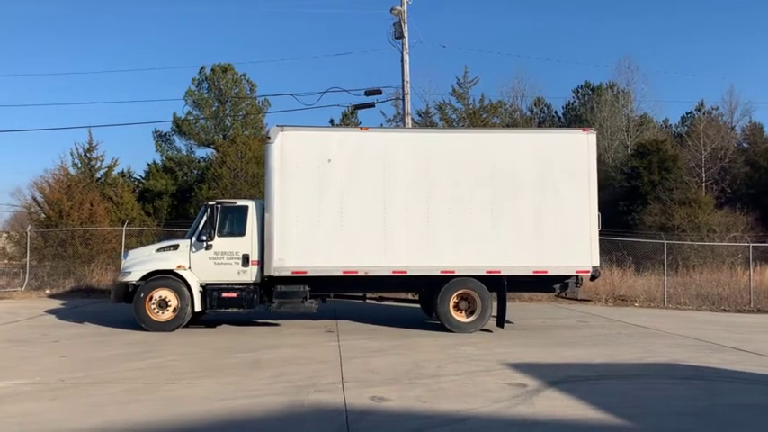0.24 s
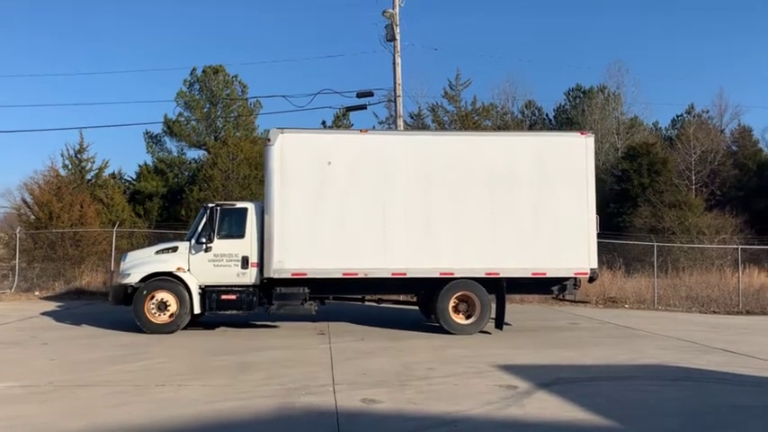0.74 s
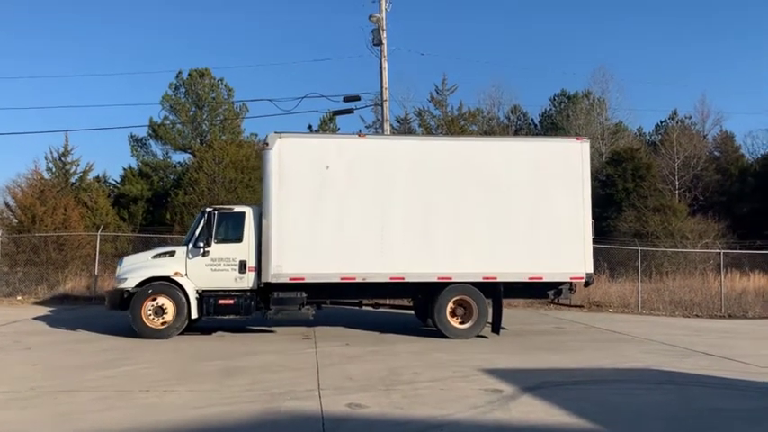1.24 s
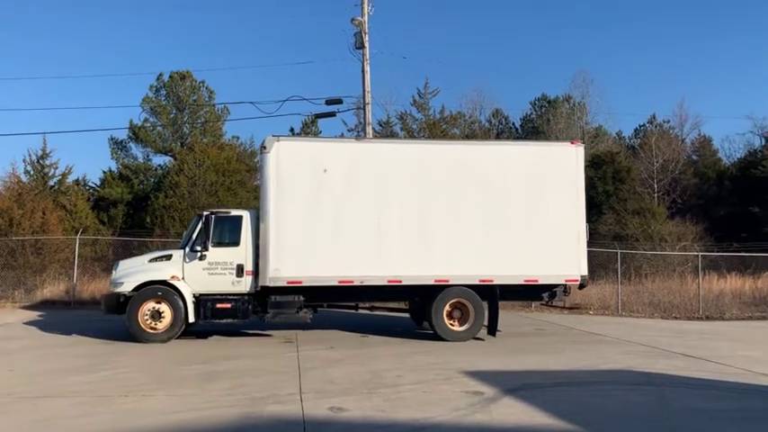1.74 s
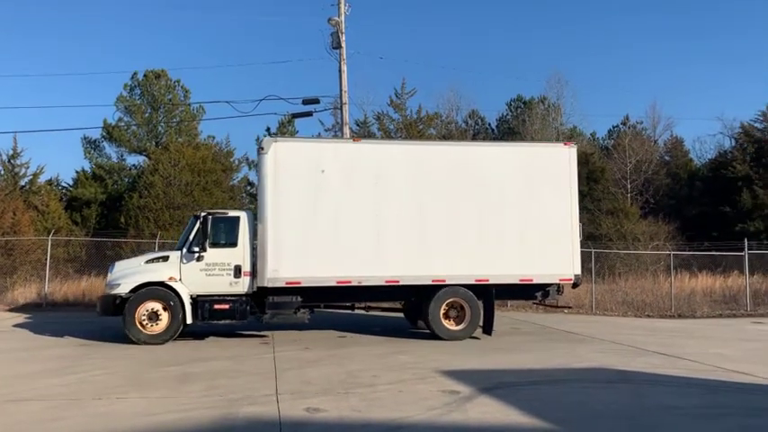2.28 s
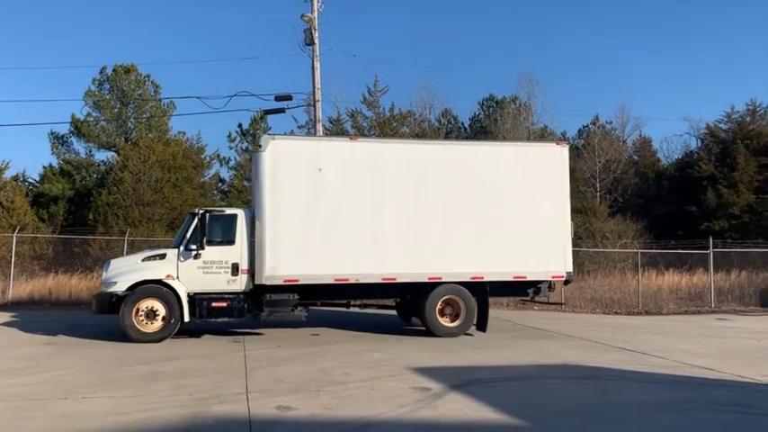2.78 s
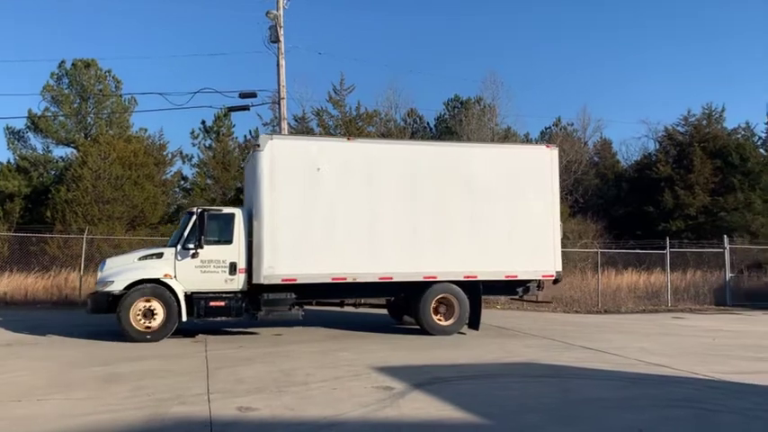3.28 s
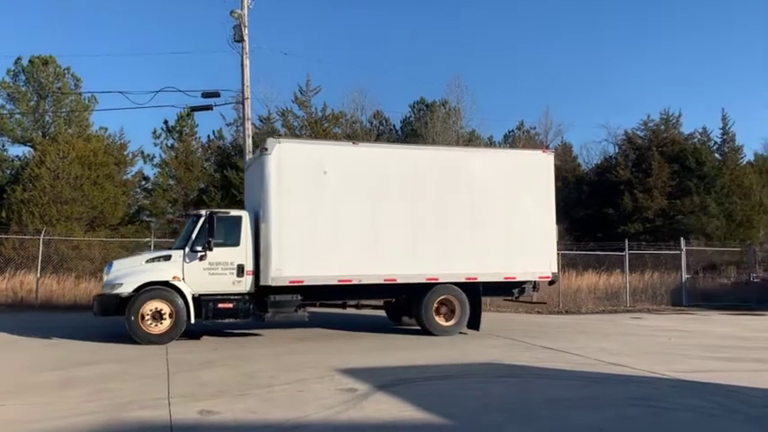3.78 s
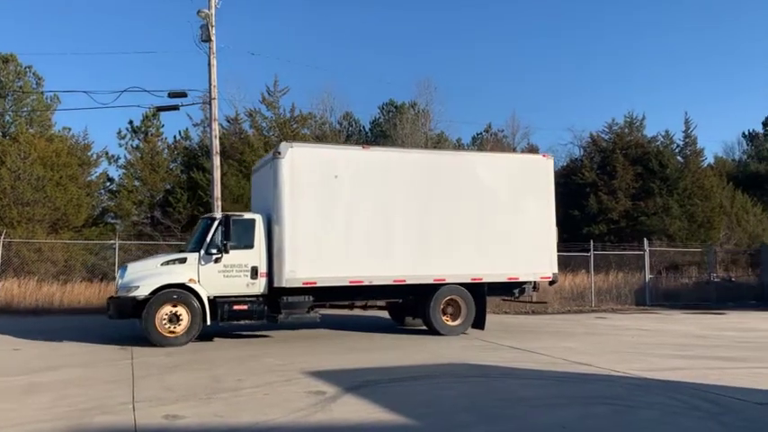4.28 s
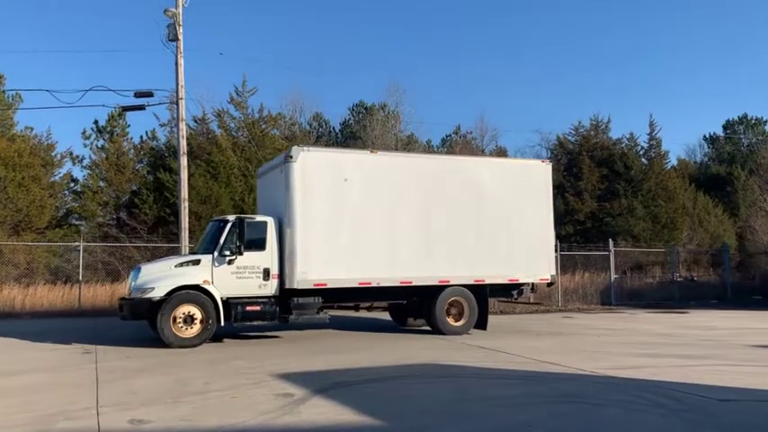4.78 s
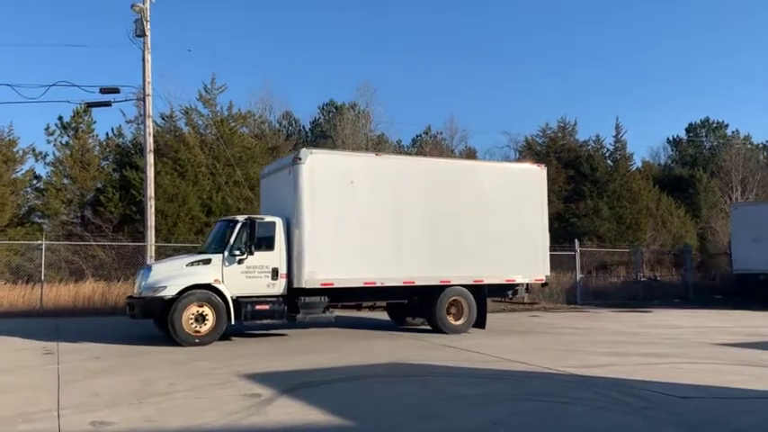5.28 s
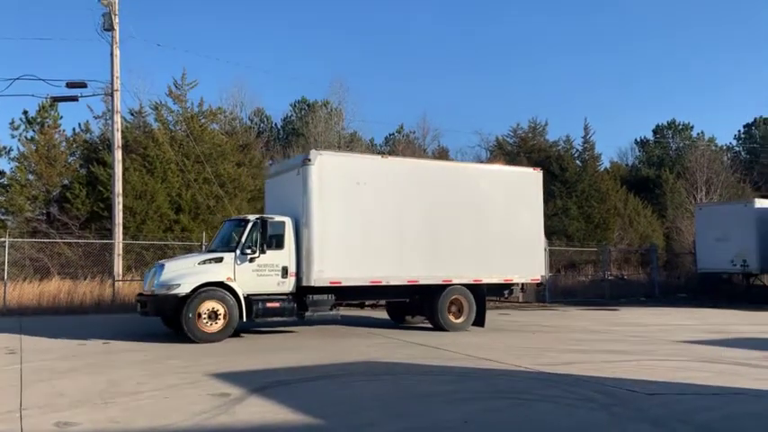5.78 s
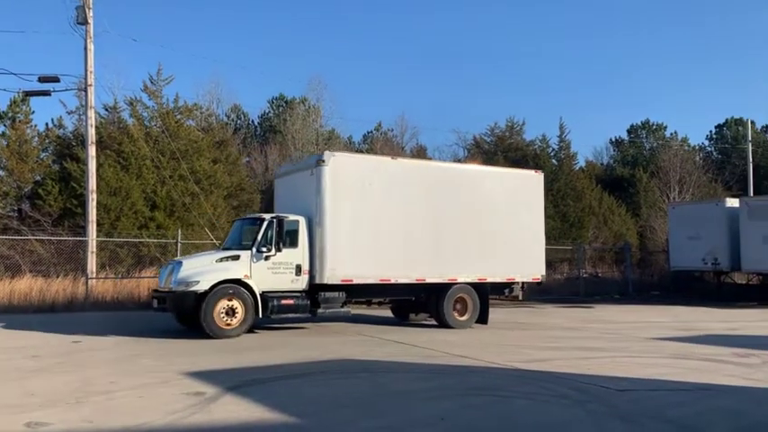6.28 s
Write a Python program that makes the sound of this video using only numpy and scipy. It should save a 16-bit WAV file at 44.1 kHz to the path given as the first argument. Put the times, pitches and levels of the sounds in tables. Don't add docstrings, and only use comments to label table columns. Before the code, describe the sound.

Outdoors on a concrete lot, a stereo microphone a few metres away hears a six-cylinder diesel truck already running. A deep, uneven exhaust drone, pulsing about 43 times a second, lifts to about 47 by 0.3 s, under a fan hum, rough midrange block roar and fast, dry injector clatter. Small irregular knocks and ticks stand out. Very faint high belt chirps come near 0.2, 1.8 and 3.3 s. Revs step up around 2.2 s and again near 4 s, the fullest point, while the turning cab dulls the roar. From about 4.8 s fuel is cut and the pitch slides down quickly, reaching a steady idle near 35 pulses a second by 5.3 s, quieter, softer and throbbing. At 6.3 s a brief bright metal rattle and crack is followed by dull thuds; the idle continues to 6.5 s. Faint airy hiss throughout.

```python
import sys
import numpy as np
from scipy import signal
from scipy.fft import rfft, irfft, next_fast_len
from scipy.io import wavfile
from scipy.ndimage import uniform_filter1d

SR = 44100
rng = np.random.default_rng(int(sys.argv[2]) if len(sys.argv) > 2 else 0)


def wav_out(sig):
    wavfile.write(sys.argv[1], SR, np.round(np.clip(np.atleast_2d(sig).T, -1, 1) * 32767).astype(np.int16))


def volts(x):
    e = np.asarray(x, float) / 20
    return 10 ** e


N = 288414

# time in seconds, firing rate in Hz.
ENGINE = [(0.0, 43.2), (0.1, 43.16), (0.32, 46.91), (1.0, 47.04), (1.82, 46.58), (2.2, 49.87),
          (2.55, 49.59), (3.55, 48.99), (4.0, 52.24), (4.8, 52.17), (4.95, 46.98), (5.1, 38.3), (5.3, 35.7),
          (6.54, 35.48)]
# time in seconds, turn from 0 to 1.
HEADING = [
    (0, 0.09),
    (3.0, 0),
    (3.8, 0.27),
    (4.7, 0.91),
    (6.54, 0.99),
]
# dB at full load side-on, dB per dB of load, dB at full turn, dB per Hz of revs.
RUMBLE_LAW = (-24.5, 0.1, 0.5, 0.48)
CLATTER_BY_CYLINDER = [2, 4, 0, 2, 3.5, 3.5]


def rms_one(x):
    return x / np.sqrt(np.mean(x ** 2) + 1e-20)


def in_time(rows):
    s, *columns = np.transpose(rows)
    return [np.interp(np.arange(N) / SR, s, c) for c in columns]


def at_hz(points, hz, column=1):
    points = np.array(points)
    return np.interp(np.log(hz + 1), np.log(points[:, 0]), points[:, column])


def colour(x, spectrum):
    size = next_fast_len(N)
    hz = np.arange(size // 2 + 1) * SR / size
    return rms_one(irfft(rfft(x, size) * volts(at_hz(spectrum, hz)), size)[:N])


def drift(rate):
    r = np.exp(-80 * np.pi * rate / SR)
    slow = signal.lfilter([1], [1, -2 * r, r * r], rng.standard_normal(N // 40 + 2002))[2000:]
    return np.interp(np.arange(N) / 40, np.arange(len(slow)), rms_one(slow))


def band(x, order, hz, kind):
    return signal.sosfilt(signal.butter(order, hz, kind, fs=SR, output="sos"), x)


def peak(hz, width_hz):
    r = np.exp(-np.pi * width_hz / SR)
    return (1 - r * r) / 2 * np.array([1, 0, -1]), [1, -2 * r * np.cos(2 * np.pi * hz / SR), r * r]


def resonate(x, peaks):
    out = 0
    for k, (hz, width_hz, db) in enumerate(peaks):
        out = out + (-1) ** k * volts(db) * signal.lfilter(*peak(hz, width_hz), x)
    return rms_one(out)


def strike(times, levels_db, modes, alternate=False):
    out, at = np.zeros(N), (np.asarray(times) * SR).astype(int)
    for k, (hz, level_db, t60) in enumerate(modes):
        clicks = np.full(N, 1e-18)
        clicks[at] = volts(levels_db + level_db + rng.normal(0, 0.93, len(at)))
        r, w = volts(-60 / (t60 * SR)), 2 * np.pi * hz / SR
        ring = signal.lfilter([0, np.sin(w)], [1, -2 * r * np.cos(w), r * r], clicks)
        out += (-1) ** (k * alternate) * ring
    return out


def follow(law):
    # time in seconds, load in dB.
    fuelling = [(0.0, -3), (0.25, -3), (0.9, -2), (1.7, 0), (2.25, 0.5), (3.0, -0.5), (4.68, 0), (4.79, 0),
                (4.86, -5.5), (5.0, -5), (5.23, -5.5), (5.29, -3), (5.5, -1), (6.05, -1), (6.35, 2.5),
                (6.54, 0.5)]
    working_hz = 50
    revs = in_time(ENGINE)[0] - working_hz
    return law[0] + law[1] * in_time(fuelling)[0] + law[2] * in_time(HEADING)[0] + law[3] * revs


def overrun(firing_hz):
    slope = np.gradient(in_time(ENGINE)[0]) * SR
    return uniform_filter1d(np.minimum(slope + 8, 0), size=2000)


def bursts(firings, by_cylinder, spread_db, sharp):
    which = firings.astype(int)
    level_db = np.array(by_cylinder)[which % 6] + spread_db * rng.standard_normal(400)[which]
    return rms_one(uniform_filter1d(volts(level_db) * np.exp(-sharp * (firings - which)), size=130))


def repeating(firings):
    every, own = rng.standard_normal((2, 900)), rng.standard_normal((2, 5400))
    place = (firings * 900).astype(int)
    return rms_one(every[:, place % 900] + .7 * own[:, place % 5400])


def tones(firing_hz, firings):
    # multiple of firing rate, dB at full load side-on, dB per dB of load, dB at full turn, dB per Hz of revs.
    main_tones = [(1, -31.5, 0, -12.5, 0.82), (3, -38, 1.5, -8, -0.04), (3.2, -39, 2.5, -7.5, 3.5),
                  (6.4, -36, 1, 1.5, 0.5), (2, -36.5, 1.5, -0.5, 0.5), (8, -47, 1.5, -9.5, -0.45)]
    # depth in dB, rate per second.
    wavers = [(.9, 5), (5, 14), (4.5, 1.7), (1, 12), (3, 9.3), (3.5, 2.7)]
    # centre in Hz, width in Hz, lift in dB.
    lifts = [(49.7, 16, 9), (144, 10.3, 8.5), (340, 14.6, 5), (366.8, 15, 8.5)]
    # multiple of firing rate, level in dB over the rumble.
    weak_tones = [(1.3, -23), (3.1, -20.5), (8 / 3, -17.5), (10, -29), (38 / 3, -28.5), (15, -23.5)]
    turn, out = 2 * np.pi * firings, 0
    for k, ((multiple, *law), (waver_db, rate)) in enumerate(zip(main_tones, wavers)):
        lift_db = sum(db / (1 + ((multiple * firing_hz - hz) / width_hz) ** 2) for hz, width_hz, db in lifts)
        sag = .02 if k == 0 else .12
        sag_db = sag * multiple ** 0.32 * overrun(firing_hz)
        level_db = follow(law) + lift_db + waver_db * drift(rate) + sag_db
        out = out + volts(level_db) * np.sin(multiple * turn + k)
    rumble_db = follow(RUMBLE_LAW) + 0.11 * overrun(firing_hz)
    for k, (multiple, level_db) in enumerate(weak_tones):
        out += volts(rumble_db + level_db + 4.2 * drift(1.9)) * np.sin(multiple * turn + k)
    return np.sqrt(2) * out


def exhaust(firings):
    manifold = [-1, 4.5, 2.5, -2.5, 6, -10]
    # centre in Hz, width in Hz, level in dB.
    pipe = [(94, 31, -11), (144.7, 19, 1.5), (181, 17, -11), (213.4, 3.5, 6), (281, 16, -5),
            (328.2, 7.7, 9.5), (370, 11, 0.5)]
    # frequency in Hz, density in dB per Hz.
    rumble = [(30, -36), (50, -3.5), (75, 4.5), (120, 3.5), (160, 5.5), (250, 3.5), (350, -1.5),
              (480, -5.5), (700, -45)]
    # dB at full load side-on, dB per dB of load, dB at full turn, dB per Hz of revs.
    ringing_law = (-5.5, 0.1, 0.5, 0)
    pulses = bursts(firings, manifold, spread_db=5.5, sharp=32.0)
    gas = colour(rng.standard_normal(N), rumble) * volts(.9 * drift(7))
    pulses = rms_one(band(pulses, 4, 70, "high"))
    ringing = resonate(pulses + 0.61 * gas, pipe)
    return volts(follow(RUMBLE_LAW)) * (volts(follow(ringing_law)) * ringing + volts(-2.5) * gas)


def box():
    # dB at full load side-on, dB per dB of load, dB at full turn, dB per Hz of revs.
    box_law = (-43, 1.1, 1.5, -0.1)
    box_hz, width_hz = 329.2, 7
    return volts(follow(box_law)) * resonate(rng.standard_normal(N), [(box_hz, width_hz, 0)])


def still_air(firing_hz):
    # frequency in Hz, density in dB per Hz.
    air_spectrum = [(5000, -24), (8000, -15), (9600, 0), (11000, 6), (12500, 6), (14200, 1), (15500, -6)]
    level_db = -69 + 0.09 * overrun(firing_hz) + 1.5 * in_time(HEADING)[0]
    return volts(level_db) * colour(rng.standard_normal(N), air_spectrum)


def block(firings):
    # time in seconds, peak in dB.
    heavy_knocks = [(0.243, -17), (0.31, -27), (0.392, -21), (0.455, -30), (0.566, -25), (0.642, -18),
                    (0.695, -19), (0.924, -21), (0.959, -19), (1.213, -16), (1.34, -26), (1.468, -19),
                    (1.541, -16), (1.725, -25), (2.045, -18), (2.103, -20), (2.448, -13), (2.587, -18),
                    (2.644, -27), (2.708, -21), (3.003, -14), (3.072, -19), (3.202, -30), (3.546, -24),
                    (3.589, -23), (3.655, -24), (4.38, -23), (4.417, -21), (4.44, -23), (4.494, -30),
                    (4.627, -31), (4.647, -26), (4.935, -33), (4.997, -35), (5.122, -38), (5.258, -33),
                    (5.288, -28), (5.31, -18), (5.399, -29), (5.485, -18.5), (5.628, -31), (5.649, -21),
                    (5.823, -25), (6.021, -27), (6.133, -24)]
    # centre in Hz, width in Hz, level in dB.
    panels = [(627, 19, 9), (772, 17.2, 16.5), (839, 32, 3), (894, 5, 0), (1079, 47, 18.5),
              (1260, 57, 18.5), (1501, 56, 16), (1702, 56, 11), (1800, 25, -1), (1167, 266, 12)]
    # frequency in Hz, density in dB per Hz.
    roar_spectrum = [(300, -61), (500, -3.5), (800, 2.5), (1300, -1.5), (1700, -5), (2100, -20.5),
                     (2800, -45)]
    # frequency in Hz, density in dB per Hz.
    bright_spectrum = [(1200, -3.5), (1700, 6), (2000, 1.5), (2400, 2), (2800, -5), (3300, -15),
                       (4500, -32.5)]
    # dB at full load side-on, dB per dB of load, dB at full turn, dB per Hz of revs.
    roar_law = (-28.5, 0.7, -5, 0.24)
    bright_law = (-7, 0.66, -5, -0.01)
    roar_db = follow(roar_law)
    knock = bursts(firings + .1, CLATTER_BY_CYLINDER, spread_db=1.5, sharp=3.0)
    rap = bursts(firings + .05, CLATTER_BY_CYLINDER, spread_db=1.2, sharp=6.0)
    heavy, knock_s, knock_db = np.zeros(N), .005, 19
    for s, level_db in heavy_knocks:
        at = int(s * SR)
        heavy[at:at + 900] += volts(level_db + knock_db) * np.exp(-np.arange(900) / SR / knock_s)
    swell = .82 + .2 * knock + .1 * rap + heavy * volts(-30 - roar_db)
    shaking = .85 * rng.standard_normal((2, N)) + .55 * repeating(firings)
    shaking = shaking * swell * volts(.2 * drift(8))
    low = volts(-.4) * colour(shaking[0], roar_spectrum) + volts(-8.5) * resonate(shaking[0], panels[:4])
    high = volts(4.0) * colour(shaking[1], bright_spectrum) + volts(3.5) * resonate(shaking[1], panels[4:])
    return volts(roar_db) * (low + volts(follow(bright_law)) * high)


def clatter(firings, firing_hz):
    # frequency in Hz, density in dB per Hz.
    clatter_spectrum = [(2200, -1), (3500, 4), (4500, 6), (5500, 2), (6500, -1), (7900, -8), (9500, -3),
                        (11000, -14), (12500, -44), (15500, -60)]
    # time in seconds, peak in dB.
    loud_ticks = [(0.2244, -41), (0.363, -37), (0.407, -45), (0.5192, -42), (0.775, -39), (0.8763, -49),
                  (0.919, -39), (1.474, -42), (1.73, -35), (1.7677, -34), (1.812, -36), (1.8776, -46),
                  (2.0204, -45), (2.0667, -37), (2.1062, -43), (2.144, -47), (2.2242, -45), (2.3263, -41),
                  (2.385, -43), (2.4668, -28.5), (2.588, -33), (2.71, -37), (2.8125, -36), (2.8521, -41),
                  (2.9554, -36), (3.037, -34), (3.117, -34), (3.1596, -41), (3.237, -43), (3.2833, -37),
                  (3.3692, -39), (3.4269, -34), (3.5703, -38), (3.6087, -50), (3.6525, -34), (3.692, -36),
                  (3.8025, -45), (4.197, -41)]
    # time in seconds, pitch in Hz.
    bay = [
        (0, 2187),
        (3.6, 2318),
        (4.2, 2110),
        (5.3, 1960),
        (6.54, 2050),
    ]
    # dB at full load side-on, dB per dB of load, dB at full turn, dB per Hz of revs.
    clatter_law = (-43, 0.5, -0.97, 0.23)
    clatter_db = follow(clatter_law) + 0.028 * overrun(firing_hz)
    gate = 0.57 + 0.35 * bursts(firings, CLATTER_BY_CYLINDER, spread_db=4.5, sharp=1.7)
    hiss = colour(gate * volts(.7 * drift(9)) * rng.standard_normal(N), clatter_spectrum) * volts(clatter_db)
    ticking = .6 + .8 * bursts(firings, CLATTER_BY_CYLINDER, spread_db=1.2, sharp=2.8)
    ticking = volts(clatter_db - 4) * ticking
    for s, level_db in loud_ticks:
        at = int(s * SR)
        ticking[at:at + 900] += volts(level_db + 2.0) * np.exp(-np.arange(900) / SR / 0.0059)
    ticking = ticking * rng.standard_normal(N)
    out = hiss + volts(-11) * colour(ticking, clatter_spectrum) * np.std(ticking)
    bay_hz, = in_time(bay)
    for multiple, width_hz, gain_db in [(2, 220, 12.1), (3, 190, 6.9)]:
        state = np.zeros(2)
        for i in range(0, N, 512):
            tuned = peak(multiple * bay_hz[i], width_hz)
            rung, state = signal.lfilter(*tuned, ticking[i:i + 512], zi=state)
            out[i:i + 512] += volts(gain_db) * rung
    return out


def squeaks():
    # time in seconds, pitch in Hz, peak in dB.
    chirps = [
        (0.238, 5670, -43),
        (1.80, 5400, -44),
        (3.285, 5610, -46),
    ]
    t, squeak_s = np.arange(N) / SR, 0.015
    out = 0
    for s, hz, db in chirps:
        out = out + volts(db) * np.exp(-((t - s) / squeak_s) ** 2) * np.sin(2 * np.pi * hz * t)
    return out


def clunk():
    # time in seconds, rattle in dB, thud in dB.
    blows = [(6.2812, -15, -40), (6.2832, -15, -24), (6.2848, -13, -26), (6.2866, -14, -30),
             (6.2882, -13, -18), (6.2905, -17, -30), (6.2935, -18, -14), (6.2975, -25, -30),
             (6.3020, -27, -24), (6.3108, -30, -11), (6.3355, -38, -17)]
    # frequency in Hz, level in dB, t60 in seconds.
    frame_modes = [(117.8, -0.5, 0.091), (171.5, 1.5, 0.096), (326, -3, 0.033), (430, -10, 0.07),
                   (629, -5.5, 0.048)]
    # frequency in Hz, level in dB, t60 in seconds.
    rattle_modes = [(720, -5, .02), (1050, -4, .018), (1350, -5, .018), (1650, -3, .018), (1920, -8, .015),
                    (2200, -2, .022), (3380, -13, .012), (3700, -15, .012), (4150, -11, .014),
                    (5200, -22, .01), (6600, -22, .006)]
    s, rattle_db, thud_db = np.transpose(blows)
    noise = np.zeros(N)
    for at, level_db in zip((s * SR).astype(int), rattle_db):
        noise[at:at + 900] += volts(level_db - 2) * np.exp(-np.arange(900) / SR / .004) * rng.standard_normal(900)
    snap_db, snap_s = -17, .003
    snap = band(noise, 2, [7500, 15000], "band")
    snap *= volts(snap_db) * np.exp(-np.clip(np.arange(N) / SR - s[1], 0, 1) / (2 * snap_s))
    crack = band(noise, 2, [450, 3000], "band")
    thud = band(strike(s, thud_db - 5.5, frame_modes), 2, [75, 800], "band")
    rattle = band(strike(s, rattle_db - 5, rattle_modes, alternate=True), 1, 4500, "low")
    blow = crack + snap + rattle - thud
    return np.array([blow, np.roll(blow, 8)])


def ports(x):
    # frequency in Hz, direct share of power 0-1, right lags left in radians, left over right in dB.
    port_response = [(60, .999, .05, -.45), (200, .985, .2, -.3), (450, .88, .45, 0), (1000, .75, 1.0, 2.2),
                     (1900, .42, 1.6, .3), (3000, .5, 1.9, -.5), (3700, .45, 3.2, -1.5),
                     (4500, .65, 5.9, -.6), (5500, .4, 6.0, -3), (6900, .7, 6.6, 0), (8000, .62, 9.4, 0),
                     (9000, .72, 11.3, 0), (11500, .68, 12.2, 0), (15000, .8, 12.56, 0)]
    scatter_s = .03
    size = next_fast_len(N + SR // 4)
    hz, spectrum = np.arange(size // 2 + 1) * SR / size, rfft(x, size)
    direct = np.clip(at_hz(port_response, hz), 0, 1)
    lag, tilt_db = at_hz(port_response, hz, column=2), at_hz(port_response, hz, column=3)
    decay = np.exp(-np.arange(SR // 4) / SR / scatter_s)
    decay = decay / np.sqrt(np.sum(decay ** 2))
    out = []
    for side in (1, -1):
        seen = spectrum * volts(side * tilt_db / 2)
        tails = rfft(rng.standard_normal((2, SR // 4)) * decay, size)
        one, other = irfft(seen * np.sqrt(1 - direct) * tails, size)[:, :N]
        angle = 2 * np.pi * (1.3 + 0.2 * side) * np.arange(N) / SR + 2.27 * drift(4.14)
        straight = irfft(seen * np.sqrt(direct) * np.exp(.5j * side * lag), size)[:N]
        out.append(straight + np.cos(angle) * one + np.sin(angle) * other)
    return np.array(out)


def scene():
    firing_hz, = in_time(ENGINE)
    firing_hz = firing_hz * (1 + .004 * drift(3))
    firings = np.cumsum(firing_hz) / SR + 1.3
    engine = tones(firing_hz, firings) + exhaust(firings) + box()
    upper = block(firings) + clatter(firings, firing_hz)
    return ports(engine + upper + still_air(firing_hz) + squeaks()) + clunk()


def low_pass(x):
    return signal.sosfilt(signal.butter(12, 15620, fs=SR, output="sos"), x)


def record(dry):
    # low edge in Hz, high edge in Hz, share of time kept 0-1, its change at full turn,
    # share of lines kept 0-1.
    starved = [(7750, 8100, .5, .05, .35), (8100, 8450, .85, -.15, .3), (8450, 8950, .3, -1, .25),
               (8950, 9050, .7, 0, .5), (9950, 10500, .85, .13, 1), (10500, 11200, .3, .1, 1),
               (11200, 11900, .5, .42, 1), (12400, 12800, .85, .15, .6), (12800, 13050, .6, .2, .4),
               (13050, 13750, 0, 0, .3), (13750, 13950, .65, .2, .5), (13950, 14400, 1, 0, .7),
               (14400, 15050, .5, .1, .35), (15050, 15700, -.02, .04, .4), (15700, 22050, 0, 0, 0)]
    fed_db = 6.5
    hz, _, frames = signal.stft(dry, SR, nperseg=2048)
    count = frames.shape[2]
    turn = in_time(HEADING)[0][np.minimum(np.arange(count) * 1024, N - 1)]
    for low_hz, high_hz, kept, change, lines in starved:
        run = 1 if low_hz > 12000 else 3 if low_hz > 10400 else 2
        runs = np.repeat(rng.random(count), run)[:count]
        inside = (hz >= low_hz) & (hz < high_hz)
        level = np.sqrt(np.mean(np.abs(frames[:, inside]) ** 2, axis=(0, 1)))
        earlier = np.pad(level, (3, 0), "edge")[:-3]
        fed = (level > volts(fed_db) * earlier) & (low_hz < 15000)
        height = inside.sum()
        speckle = np.repeat(rng.random((height, count)), 3, axis=0)[:height] < lines
        thinned = (runs < kept + change * turn) * speckle / np.sqrt(max(lines, .1))
        frames[:, inside] *= np.where(fed, 1, thinned)
    return low_pass(signal.istft(frames, SR, nperseg=2048)[1][:, :N])


dry = scene()
out = record(dry)
wav_out(out)
```